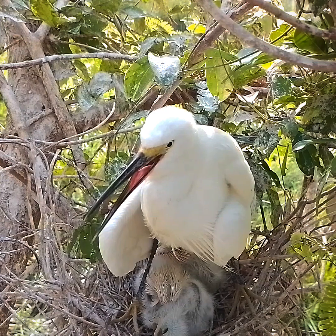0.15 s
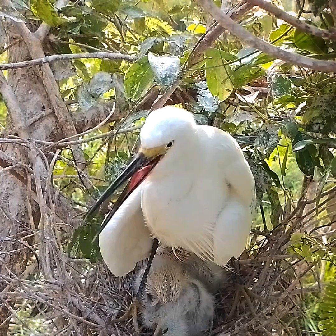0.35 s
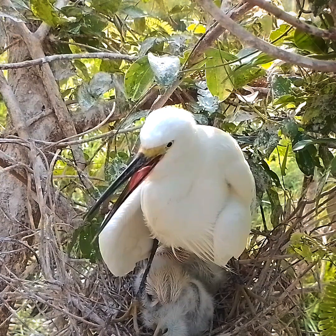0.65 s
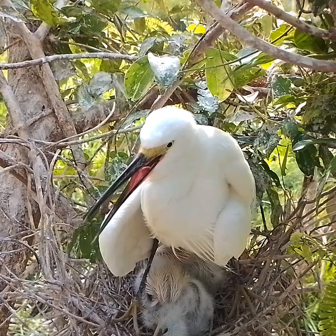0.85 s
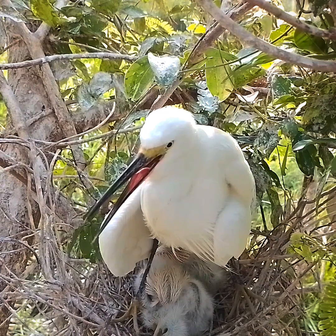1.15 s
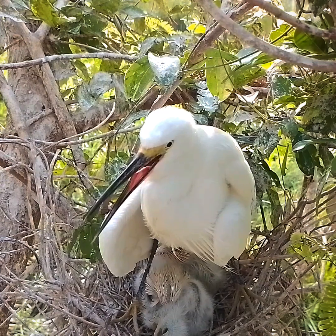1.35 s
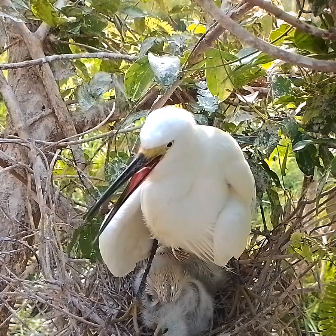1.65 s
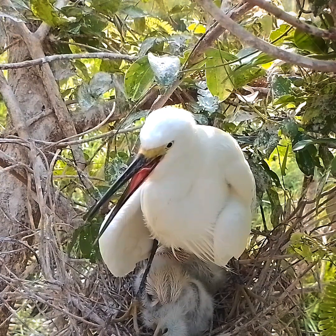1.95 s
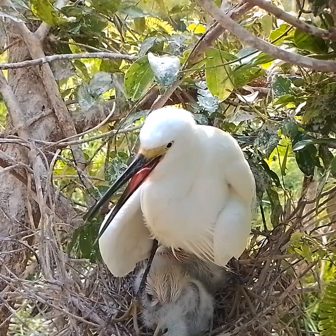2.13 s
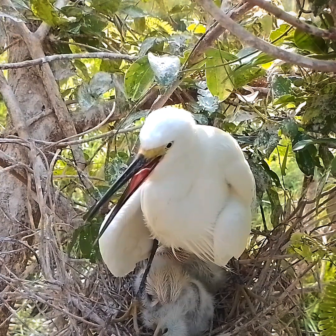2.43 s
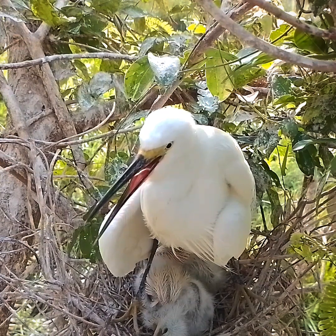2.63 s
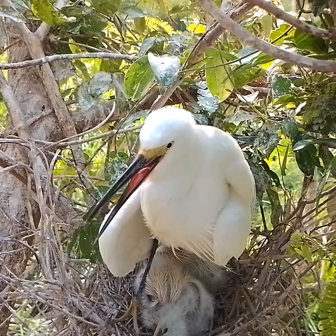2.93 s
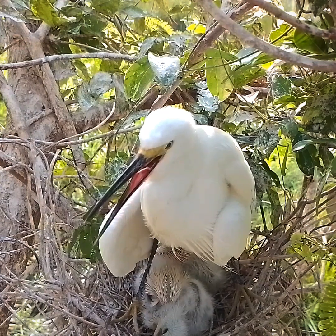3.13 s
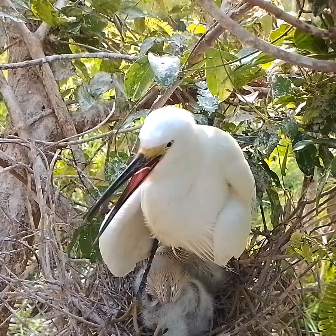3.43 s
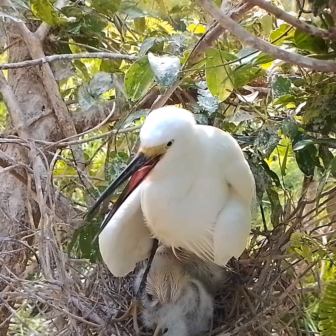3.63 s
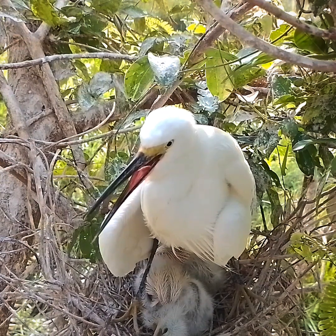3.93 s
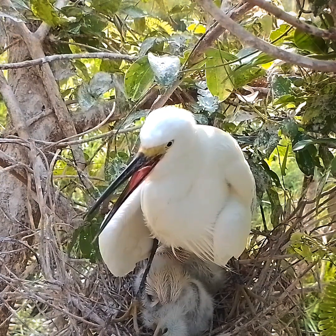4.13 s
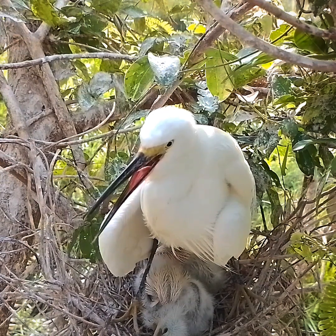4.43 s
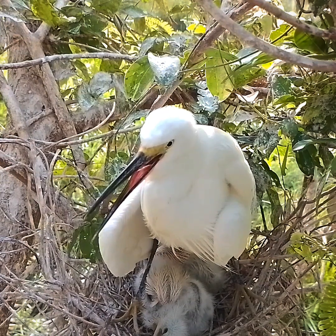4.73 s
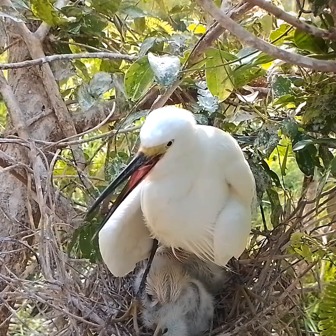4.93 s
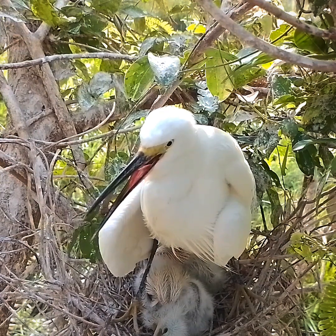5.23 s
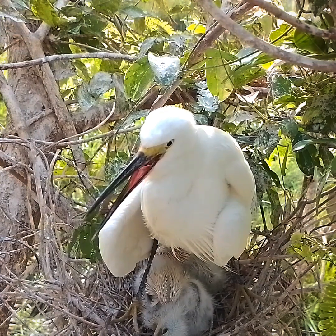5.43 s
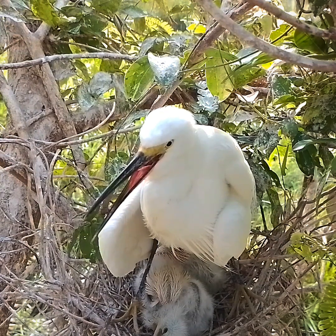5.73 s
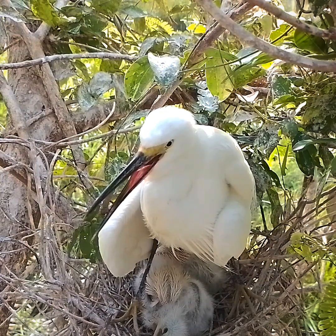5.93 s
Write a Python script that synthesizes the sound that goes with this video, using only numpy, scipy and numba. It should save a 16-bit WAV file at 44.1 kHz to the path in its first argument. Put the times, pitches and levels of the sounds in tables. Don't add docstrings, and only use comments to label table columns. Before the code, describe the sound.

Begging nestlings beneath a white egret: a hoarse breathy hiss and squeaky rasp first, then irregular woody clucks growing louder from three seconds on. Scattered quieter clicks, short hisses, airy whistles and a few low squawks fill the gaps. Two quick throaty croaks and a clearer peep close it. The near clucks are dry and close, the other chicks blurred by twigs and leaves, over quiet insects, distant rumble and gentle gusts on a small stereo recorder.

```python
import sys
import numpy as np
from scipy import signal
from scipy.fft import rfft, irfft, next_fast_len
from scipy.io import wavfile
from scipy.ndimage import uniform_filter1d
from numba import njit

SR = 44100
rng = np.random.default_rng(int(sys.argv[2]) if len(sys.argv) > 2 else 0)


def dump(signal):
    limited = np.clip(np.atleast_2d(signal).T, -1, 1)
    pcm = np.round(limited * 32767).astype(np.int16)
    wavfile.write(sys.argv[1], SR, pcm)


def voltage_ratio(level):
    return 10 ** (np.asarray(level, float) / 20)


N = 267951
HZ = np.fft.rfftfreq(next_fast_len(N + SR // 2), 1 / SR)
PORT_LAG_S = 0.0003204

# (centre [Hz], width [Hz], level [dB])
BEAK_MODES = [(6326, 250, 4.5), (7300, 980, 0.5), (10560, 2140, -4.5)]


def clucks():
    # (time [s], peak [dB], low throat [dB], beak [dB], length [s])
    cluck_rows = [(0.161, -48, -10.5, 5, 0.017), (0.57, -31.5, -30, -8, 0.025),
                  (0.896, -40.5, -18.5, -9.5, 0.018), (1.623, -34.5, -23, -6, 0.02),
                  (1.98, -38.5, -16.5, -3, 0.028), (2.304, -37, -19, -1, 0.024),
                  (2.579, -38.5, -15, -1.5, 0.021), (3.055, -28, -23.5, -6.5, 0.027),
                  (3.305, -27, -29.5, -1, 0.02), (3.549, -31, -19.5, 1, 0.027),
                  (4.031, -30, -16.5, -4, 0.024), (4.305, -31.5, -13.5, -1, 0.022),
                  (4.7962, -32.5, -16, -3.5, 0.02), (5.078, -31, -18, -2, 0.018),
                  (5.712, -29, -18.5, -5, 0.022), (5.986, -30.5, -12.5, -3.5, 0.022)]
    # (low [Hz], high [Hz])
    throat_hz = [(2280, 3050), (2290, 3320), (2050, 3060), (2220, 3200), (2040, 3320), (2330, 3180),
                 (2140, 3240), (2310, 3060), (2050, 3130), (2320, 3090), (2320, 3080), (2370, 3150),
                 (2160, 3030), (2060, 3260), (2270, 3260), (2270, 3410)]
    # (centre [Hz], width [Hz], level [dB])
    chest_modes = [(536, 100, -0.5), (990, 810, -7.5)]
    upper_throat_modes = [(3630, 700, -6), (4460, 870, -5)]
    low_width_hz, high_width_hz, high_db = 330, 280, 3.5

    s, peak_db, low_db, beak_db, long = np.transpose(cluck_rows)
    chest_db = -21.5 + 0.62 * (low_db + 18.5) - 0.52 * (peak_db + 33)
    slaps, owner = bursts(s, long, gap_s=.00175, jitter=.11, spread_db=3.5, breath=.1, slow_start=.9)
    slaps = slaps * voltage_ratio(peak_db + 16)[owner]
    parts = [(chest_modes, chest_db + 11), (upper_throat_modes, 0 * s), (BEAK_MODES, beak_db)]
    out = sum(resonate(slaps * voltage_ratio(db)[owner], modes) for modes, db in parts)
    for start, db, (low_hz, high_hz) in zip(s, low_db, throat_hz):
        first = int(start * SR)
        span = slice(first - 8, first + SR // 12)
        throat = [(low_hz, low_width_hz, db + 14.5), (high_hz, high_width_hz, high_db)]
        out[span] += resonate(slaps[span], throat)
    return out


def ticks():
    # (time [s], peak [dB], low throat [dB], beak [dB], length [s])
    tick_rows = [(0.717, -53.5, -11.5, -20, 0.017), (0.919, -47, -32, 8, 0.025),
                 (1.076, -58.5, -5.5, 10.5, 0.023), (1.294, -57, -6, -22, 0.032),
                 (1.755, -53.5, -8, 5, 0.015), (1.87, -60, -10, -19, 0.039), (2.015, -53, -30, 16, 0.03),
                 (2.185, -60, -4, 14, 0.015), (2.41, -57.5, -3.5, 11.5, 0.011), (2.431, -58, -25, 8, 0.037),
                 (2.611, -45, -20, 10.5, 0.039), (2.656, -54.5, -27, 17, 0.047),
                 (2.796, -51, -16.5, -23, 0.044), (2.987, -46.5, -8.5, 3.5, 0.014),
                 (3.874, -48.5, -4.5, 16.5, 0.011), (3.998, -51.5, -19, -24, 0.014),
                 (4.093, -53, -1, 18.5, 0.018), (4.187, -50.5, -17.5, -28, 0.017),
                 (4.366, -51.5, -2, 14, 0.016), (4.871, -55, -7.5, 18.5, 0.036),
                 (5.099, -51.5, -2, 13, 0.029), (5.515, -54, -6, 11.5, 0.037),
                 (5.5513, -56, -2.5, 14, 0.038), (5.919, -53.5, 0, -14, 0.035)]
    # (centre [Hz], width [Hz], level [dB])
    low_throat_modes = [(2130, 500, 3)]
    throat_modes = [(3110, 790, -4), (4770, 870, -2.5)]

    s, peak_db, low_db, beak_db, long = np.transpose(tick_rows)
    slaps, owner = bursts(s, long, gap_s=.0022, jitter=.45, spread_db=3, breath=.3, slow_start=0)
    slaps = slaps * voltage_ratio(peak_db + 8.5)[owner]
    parts = [(low_throat_modes, low_db + 5), (throat_modes, 0 * s), (BEAK_MODES, beak_db - 19.5)]
    return sum(resonate(slaps * voltage_ratio(db)[owner], modes) for modes, db in parts)


def bursts(start, length, gap_s, jitter, spread_db, breath, slow_start):
    chance = rng.standard_normal((len(start), 40, 2))
    air, out, owner = rng.standard_normal(N), np.zeros(N), np.zeros(N, int)
    slowing = 1 + slow_start * np.exp(-np.arange(40) / 2)
    for k, (s, long) in enumerate(zip(start, length)):
        after = np.cumsum(gap_s * slowing * np.exp(jitter * chance[k, :, 0]))
        after -= after[0]
        swell = np.clip((after + .004) / .0065, 0, 1) * np.exp(-.6 * (after / long) ** 2)
        strength = swell * voltage_ratio(spread_db * chance[k, :, 1])
        within = after < long
        at = np.round((s + after[within]) * SR).astype(int)
        out[at] += strength[within]
        span = slice(at[0], at[0] + int(long * SR))
        out[span] += breath * air[span] * np.hamming(span.stop - span.start) ** .5
        owner[at[0]:] = k
    return out, owner


def resonate(x, modes):
    out = 0
    for k, (hz, width, db) in enumerate(modes):
        r = np.exp(-np.pi * max(width, 20) / SR)
        poles = [1, -2 * r * np.cos(2 * np.pi * hz / SR), r * r]
        ring = signal.lfilter([1, 0, -1], poles, x + 1e-18)
        out = out + (-1) ** k * voltage_ratio(db) * (1 - r * r) / 2 * ring
    return out


def croaks():
    # (time [s], pitch [Hz], level [dB])
    croak_courses = [
        [(5.35, 285, -78), (5.366, 322, -63), (5.384, 370, -56), (5.4, 335, -58), (5.413, 280, -65),
         (5.44, 220, -78)],
        [(5.803, 245, -76), (5.818, 290, -61), (5.842, 364, -55), (5.857, 335, -57), (5.87, 280, -64),
         (5.882, 245, -80)],
    ]
    # (centre [Hz], width [Hz], level [dB])
    croak_modes = [(324, 870, -1), (713, 140, 4.5), (1565, 610, 5.5), (2403, 430, 8), (3130, 2000, -7),
                   (7400, 900, 0)]

    out = np.zeros(N)
    t = np.arange(N) / SR
    for rows in croak_courses:
        hz, db = in_time(rows)
        cycles = np.cumsum(hz * (1 + .012 * drift(150))) / SR
        pulses = np.diff(np.floor(cycles), prepend=0)
        uneven = voltage_ratio(db + 35 + 1.1 * rng.standard_normal(N))
        out += pulses * uneven * (t > rows[0][0]) * (t < rows[-1][0])
    return resonate(out, croak_modes)


def hisses(source):
    # (time [s], length [s], beak [dB], throat against beak [dB], air against beak [dB])
    hiss_rows = [(0, 0.31, -59.5, -10, -8.5), (0.213, 0.21, -53.5, -16.5, -2),
                 (0.451, 0.13, -51.5, -11.5, -2), (0.715, 0.081, -61, -10.5, -7),
                 (0.925, 0.087, -61, -10.5, -9.5), (1.171, 0.47, -63, -13, -5),
                 (1.628, 0.038, -55, -9.5, -11), (1.762, 0.33, -60.5, -11, -6.5),
                 (2.234, 0.12, -63, -15, -11.5), (2.697, 0.18, -59.5, -11.5, -9),
                 (2.928, 0.15, -59, -15, -11), (3.057, 0.21, -50.5, -11, -8),
                 (3.297, 0.18, -41.5, -18.5, -9.5), (3.576, 0.22, -47.5, -21, -11.5),
                 (3.842, 0.085, -67, -17.5, -19), (4.059, 0.013, -51, -12.5, -11),
                 (4.128, 0.053, -60.5, -34, -8), (4.359, 0.08, -57.5, -10.5, -7.5),
                 (4.57, 0.26, -63.5, -10, -4.5), (4.825, 0.38, -58.5, -12.5, -3.5),
                 (5.092, 0.051, -48.5, -16, -8.5), (5.319, 0.14, -56.5, -11, -7),
                 (5.73, 0.18, -54.5, -9.5, -6), (5.991, .12, -52.5, -9, -5.5)]
    lull_beak_db, lull_throat_db, lull_air_db = -65, -76, -76

    s, long, db, throat, air = np.transpose(hiss_rows)
    power = swells(s, long, rise=235, fall=186.5)
    beak_db = summed_db(power, db, lull_beak_db)
    air_db = summed_db(power, db + air, lull_air_db)
    throat_db = summed_db(power, db + throat, lull_throat_db)
    throb_db = 0.14 * drift(37)
    low_throat = glide(source, np.full(N, 2095), width=490)
    layers = [(band(source, 2500, 5800), throat_db + 8),
              (low_throat, throat_db - 7.5 + 3 * drift(6.4)),
              (band(source, 6290, 8530), beak_db - 4),
              (band(source, 8600, 14300), air_db + 8)]
    return sum(x * voltage_ratio(level_db + throb_db + 1.3 * drift(18)) for x, level_db in layers)


def colony_calls(source, other):
    # (time [s], length [s], level [dB], start [Hz], end [Hz])
    wheeze_rows = [(0, 0.052, -57.5, 3030, 3130), (1.11, .2, -65, 3690, 3150),
                   (1.321, .26, -61.5, 3220, 2980), (2.5, 0.17, -58, 3640, 3400), (3, .16, -56, 3360, 3470),
                   (3, 0.14, -51.5, 3200, 3150), (4.8, 0.13, -62.5, 3050, 3000),
                   (2.5, 0.035, -64.5, 3100, 3100), (3, 0.23, -64, 3900, 2900),
                   (3.652, 0.19, -53, 4020, 3920), (4, 0.077, -59.5, 4070, 4070),
                   (3.5, .18, -52.5, 6300, 6300), (3.5, 0.24, -58.5, 4900, 5200),
                   (4.5, 0.71, -67, 3100, 3470), (5.33, 0.15, -65, 2866, 2700)]
    whistle_rows = [(.645, .03, -60, 2760, 2720), (1.69, .25, -63, 3960, 4000), (1.7, .2, -68, 4870, 4930),
                    (2.75, .13, -62, 3420, 3170), (2.86, .11, -56.5, 3160, 3040),
                    (3.2, .21, -58, 3730, 3690), (3.41, .06, -63, 1960, 1930)]
    peep_rows = [(5.972, .045, -52, 3480, 3420), (6.005, .1, -48, 3420, 3380),
                 (6.012, .07, -58, 3050, 3070)]
    squawk_rows = [(0, 0.029, -75, 1960, 1920), (0.21, 0.037, -69, 1960, 1950),
                   (1.647, 0.078, -59.5, 1510, 1414), (3.206, 0.032, -59.5, 2130, 2240),
                   (3.642, 0.11, -55, 1960, 1910), (3.659, .185, -56.5, 1664, 1605),
                   (3.766, .09, -63.5, 1410, 1343), (3.799, .04, -55, 1766, 1597),
                   (3.863, .052, -55, 1810, 1720), (5.115, 0.088, -69, 1875, 1900),
                   (5.311, 0.19, -68, 1780, 2160), (5.769, 0.188, -68, 2270, 2210),
                   (0.567, 0.035, -58.5, 1030, 1012), (1.516, .05, -69, 1910, 1900),
                   (5.632, 0.054, -67.5, 2020, 1930)]
    rasp_rows = [(.175, .385, -52, 2780, 2720), (.155, .05, -55, 3050, 3080), (.19, .16, -48.5, 3030, 3140),
                 (.34, .07, -53, 3300, 3200), (.405, .063, -46, 2950, 2900), (.42, .048, -51, 2710, 2690),
                 (.47, .095, -50.5, 3000, 3050), (.16, .4, -54.5, 3350, 3300), (.585, .05, -64, 3150, 3000),
                 (3.66, .08, -62, 2690, 2650), (3.755, .06, -64, 2580, 2560), (3.895, .03, -62, 2630, 2610)]
    thin_rows = [(1.092, 0.63, -77.5, 7500, 7540), (1.65, 0.4, -68.5, 7430, 7550),
                 (2.59, 0.81, -74.5, 7470, 7680), (3.093, 0.2, -59.5, 7420, 7600),
                 (3.309, 0.24, -55.5, 7150, 7530), (3.618, 0.35, -65.5, 7660, 7810),
                 (4.489, 0.44, -66.5, 7250, 7540), (4.826, 0.41, -64.5, 7250, 7580),
                 (5.295, 0.32, -63.5, 7770, 7400), (5.767, 0.56, -74.5, 7450, 7770),
                 (0, 0.18, -71, 8150, 8450), (1.12, 0.69, -74, 8400, 8560), (1.7, 0.33, -72.5, 8800, 8750),
                 (4.5, 0.67, -68.5, 8500, 8550)]

    breathy = wheezes(other, wheeze_rows, width=700, overtones_db=0, steady_s=.04, flutter_db=1.5)
    calls = above(breathy, hz=1900)
    calls += wheezes(other, whistle_rows, width=150, overtones_db=-9, steady_s=.04, flutter_db=1.5)
    calls += wheezes(other, peep_rows, width=80, overtones_db=-9, steady_s=.008, flutter_db=.3)
    squawks = wheezes(source, squawk_rows, width=330, overtones_db=-15, steady_s=.015, flutter_db=.5)
    calls += above(squawks, hz=1200)
    rasps = wheezes(other, rasp_rows, width=210, overtones_db=-8, steady_s=.02, flutter_db=.5)
    calls += above(rasps, hz=2600)
    calls += wheezes(other, thin_rows, width=430, overtones_db=-60, steady_s=.03, flutter_db=1.2)
    return calls


def wheezes(source, rows, width, overtones_db, steady_s, flutter_db):
    edge_s, sag_db = 0.01, -1
    out = np.zeros((2, N))
    for s, long, db, start_hz, end_hz in rows:
        span = slice(int(s * SR), min(int((s + long) * SR), N))
        along = np.linspace(0, 1, span.stop - span.start)
        hz = start_hz + (end_hz - start_hz) * along
        edges = np.clip(np.minimum(along, 1 - along) * long / edge_s, 0, 1) * voltage_ratio(sag_db * along)
        overtone_db = -12 + overtones_db + 0.39 * (db + 58.5)
        for order, share_db in zip((1, 2, 3), (0, overtone_db, overtone_db)):
            tone = glide(source[:, span], order * hz, order * width)
            power = tone.sum(axis=0) ** 2 + .3 * np.sum(tone ** 2, axis=0)
            even = tone / np.sqrt(uniform_filter1d(power, size=int(steady_s * SR)) + .05)
            out[:, span] += rms_one(even) * voltage_ratio(db + share_db) * edges
    return out * voltage_ratio(flutter_db * drift(18))


def glide(source, hz, width):
    damp = np.exp(-np.pi * width / SR) + 0 * hz
    return rms_one(np.array([moving_resonance(x, 2 * np.pi * hz / SR, damp) for x in source]))


@njit
def moving_resonance(x, turn, r):
    for _ in range(2):
        y = np.zeros(len(x))
        for i in range(2, len(x)):
            drive = (1 - r[i] ** 2) / 2 * (x[i] - x[i - 2])
            y[i] = drive + 2 * r[i] * np.cos(turn[i]) * y[i - 1] - r[i] ** 2 * y[i - 2]
        x = y
    return x / np.sqrt(1 - r ** 2)


def crowd_rasp(patchy_db):
    common, left, right = [rasp(per_s=1200, spread_db=3, breath=1.1) for _ in range(3)]
    cells = signal.stft(at_ports(common, np.array([left, right])), nperseg=512)[2]
    patches = uniform_filter1d(rng.standard_normal(cells.shape[1:]), size=3, axis=0)
    patches = uniform_filter1d(patches, size=16, axis=1)
    return signal.istft(cells * voltage_ratio(patchy_db * rms_one(patches)), nperseg=512)[1][:, :N]


def rasp(per_s, spread_db, breath):
    struck = rng.random(N) < per_s / SR
    slaps = struck * voltage_ratio(spread_db * rng.standard_normal(N)) * rng.choice([-1, 1], N)
    return rms_one(rms_one(slaps) + breath * rng.standard_normal(N))


def insects(source):
    return glide(source, np.full(N, 10890), width=330) * voltage_ratio(-71.5 + 2 * drift(3.9))


def far_air():
    # (frequency [Hz], density [dB per Hz])
    rumble_spectrum = [(88, -74), (150, -60), (171, -9), (270, 4), (398, 4), (522, 2), (646, 4.5),
                       (1050, -2.5), (1640, 1.5), (1860, -20.5), (2500, -2), (3250, -27), (5500, -120)]
    # (frequency [Hz], density [dB per Hz])
    wind_spectrum = [(15, -19), (30, -15), (50, -4), (100, -10), (130, -12.5), (170, -30), (300, -32.5)]
    # (time [s], level [dB])
    gust_rows = [
        (0.442, -89),
        (4.15, -92),
        (4.802, -94),
        (5.361, -80.5),
        (5.941, -74.5),
    ]
    rumble_db, calm_db, fade_db_per_s = -76.5, -86.5, 67

    s, gust_db = np.transpose(gust_rows)
    wind_db = summed_db(swells(s, 0 * s, fade_db_per_s, fade_db_per_s), gust_db, calm_db)
    rumble = low_air(rumble_spectrum, rumble_db + 0.47 * (wind_db - calm_db), lumpy_db=2)
    return rumble + low_air(wind_spectrum, wind_db, lumpy_db=1.5)


def low_air(spectrum, level_db, lumpy_db):
    white = rng.standard_normal((3, N))
    noise = shaped(at_ports(white[0], white[1:]), voltage_ratio(at_hz(spectrum)))
    return rms_one(noise) * voltage_ratio(level_db - 0.84 + lumpy_db * drift(18))


def through_twigs(x, scatter_db, t60, lag_s):
    t = np.arange(SR // 4) / SR
    tail = rng.standard_normal((2, len(t))) * voltage_ratio(-60 * t / t60) * (1 - np.exp(-t / 0.0035))
    tail = signal.sosfilt(signal.butter(1, 2200, "high", fs=SR, output="sos"), tail)
    tail = voltage_ratio(scatter_db) * tail / np.sqrt(np.sum(tail ** 2, axis=1, keepdims=True))
    return shaped(x, lagged(lag_s) + rfft(tail, 2 * len(HZ) - 2))


def at_ports(common, own):
    # (frequency [Hz], share common to both [1])
    likeness = [(60, .92), (200, .75), (500, .65), (1200, .55), (2500, .4), (4500, .15), (9000, .05)]
    alike = at_hz(likeness)
    return shaped(common, np.sqrt(alike) * lagged(PORT_LAG_S)) + shaped(own, np.sqrt(1 - alike))


def lagged(lag_s):
    return np.exp(-2j * np.pi * HZ * lag_s * np.c_[[0, 1]])


def swells(start, length, rise, fall):
    since = np.arange(0, N, 16) / SR - np.c_[start]
    before, after = np.minimum(since, 0), np.maximum(since - np.c_[length], 0)
    return voltage_ratio(2 * (rise * before - fall * after))


def summed_db(power, level_db, lull_db):
    total = voltage_ratio(2 * np.asarray(level_db)) @ power + voltage_ratio(2 * lull_db)
    return np.interp(np.arange(N) / 16, np.arange(len(total)), 10 * np.log10(total))


def rms_one(x):
    return x / np.sqrt(np.mean(x ** 2) + 1e-20)


def in_time(rows):
    s, *columns = np.transpose(rows)
    return [np.interp(np.arange(N) / SR, s, c) for c in columns]


def at_hz(points):
    hz, value = np.transpose(points)
    return np.interp(np.log(HZ + 1), np.log(hz), value)


def shaped(x, response):
    size = 2 * len(HZ) - 2
    return irfft(rfft(x, size) * response, size)[..., :N]


def drift(rate):
    r = np.exp(-2 * np.pi * rate / SR)
    return rms_one(signal.lfilter([1], [1, -2 * r, r * r], rng.standard_normal(N + SR))[SR:])


def band(x, low_hz, high_hz):
    return rms_one(signal.sosfilt(signal.butter(2, [low_hz, high_hz], "band", fs=SR, output="sos"), x))


def above(x, hz):
    return signal.sosfilt(signal.butter(6, hz, "high", fs=SR, output="sos"), x)


def scene():
    near = through_twigs(clucks(), scatter_db=-6.5, t60=.09, lag_s=PORT_LAG_S)
    near += through_twigs(croaks(), scatter_db=-4, t60=0.078, lag_s=.00025)
    far = through_twigs(ticks(), scatter_db=10.5, t60=0.079, lag_s=PORT_LAG_S)
    source = crowd_rasp(patchy_db=2.6)
    other = source[:, ::-1].copy()
    floor = far_air()
    calls = colony_calls(source, other)
    floor += insects(other)
    return near + far + hisses(source) + calls + floor


def thrifty_storage(x, step_db, own_share, tilt_db, size=1024, count=16):
    n, k = np.arange(2 * size), np.arange(size)
    window = np.sin(np.pi * (n + .5) / size / 2)[:, None]
    basis = np.cos(np.pi / size * np.outer(n + (size + 1) / 2, k + .5)) * window
    blocks = np.pad(x, ((0, 0), (size, 2 * size - N % size))).reshape(2, -1, size)
    frames = np.concatenate([blocks[:, :-1], blocks[:, 1:]], axis=2)
    terms = (frames @ basis).reshape(2, -1, size // count, count)
    band_db = 10 * np.log10(np.mean(terms ** 2, axis=3, keepdims=True) + 1e-20)
    loudest_db = band_db.max(axis=2, keepdims=True)
    height = np.linspace(0, 1, size // count)[:, None]

    recent_db = uniform_filter1d(loudest_db, size=7, axis=1, origin=2)
    strain_db = .5 * (recent_db - np.median(recent_db))
    repaid = .11 * np.arange(terms.shape[1])[:, None, None]
    debt = np.maximum.accumulate(recent_db.max(axis=0) + repaid, axis=0) - repaid
    top = (height > .545) - .4 * (height > .59)
    debt_db = 5.5 * np.clip((debt - debt.max() + 6.5) / 3, 0, 1) * top
    bright_db = uniform_filter1d(band_db[:, :, 18:24].max(axis=(0, 2), keepdims=True), size=5, axis=1)
    valley = (height > .04) * (height < .07)
    debt_db = debt_db + 5 * np.clip((bright_db - bright_db.max() + 11) / 3, 0, 1) * valley

    wobble_db = 5 * uniform_filter1d(rng.standard_normal(band_db.shape), size=3, axis=1)
    base_db = own_share * band_db + (0.5 - own_share) * loudest_db + step_db + tilt_db * height ** 4
    step = voltage_ratio(base_db + wobble_db + strain_db + debt_db)
    coarse = np.sign(terms) * step * np.floor(np.abs(terms) / step + 0.47)
    power = np.mean(frames.reshape(2, len(frames[0]), count, -1) ** 2, axis=3)
    attack = np.any(power[..., 2:] > 7 * power[..., :-2], axis=(0, 2))
    spared = attack[:, None, None] & (height < .56) & (height > .07) | (height < .03)
    back = np.where(spared, terms, coarse).reshape(2, -1, size) @ basis.T * 2 / size
    return (back[:, :-1, size:] + back[:, 1:, :size]).reshape(2, -1)[:, :N]


def roll_off(x):
    return signal.sosfilt(signal.butter(12, 14450, fs=SR, output="sos"), x)


def record(dry):
    # (frequency [Hz], level [dB])
    left_port = [(2300, 3), (2950, 4), (3600, 2.5), (5500, 4), (6300, 5), (7100, 9), (7750, 12.5),
                 (8150, 6), (9200, 5), (10000, -10.5), (10600, -8.5), (11200, -13.5), (12500, -8.5),
                 (14300, -29.5)]
    right_port = [(2300, 3), (3100, -1), (4000, 1), (5500, -2), (6500, -6.5), (8100, -5), (9100, 5.5),
                  (9600, -3), (10200, 7.5), (10600, -2), (11100, 3.5), (12200, -5.5), (12800, -13),
                  (14300, -22.5)]

    cepstrum = irfft(np.log(voltage_ratio([at_hz(left_port), at_hz(right_port)])))
    cepstrum[:, 1:len(HZ) - 1] *= 2
    cepstrum[:, len(HZ):] = 0
    ports = shaped(dry, np.exp(rfft(cepstrum)) * (HZ < 14300))
    self_noise = voltage_ratio(-71) * rng.standard_normal((2, N))
    ports = ports + shaped(self_noise, (HZ > 9000) * (HZ < 14300))
    stored = thrifty_storage(ports, step_db=-8, own_share=.65, tilt_db=34)
    return roll_off(stored)


dry = scene()
out = record(dry)
dump(out)
```